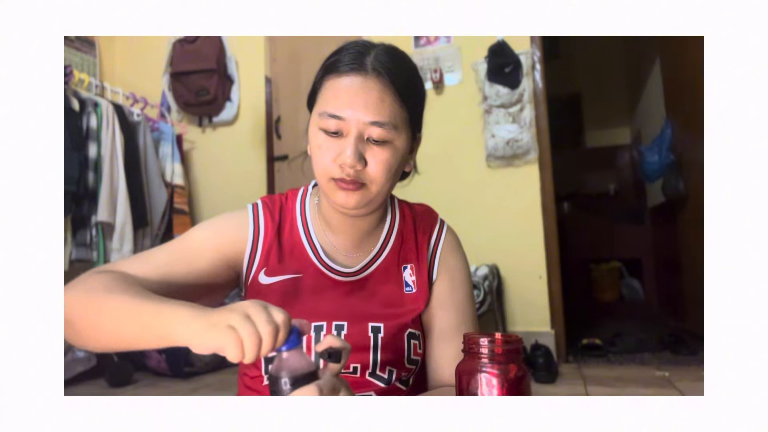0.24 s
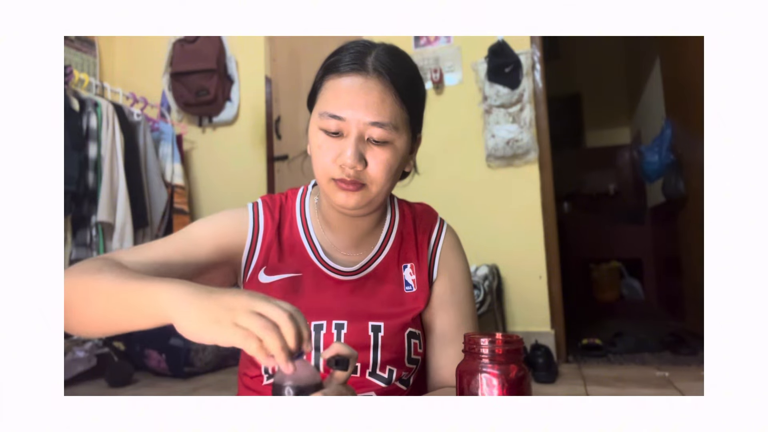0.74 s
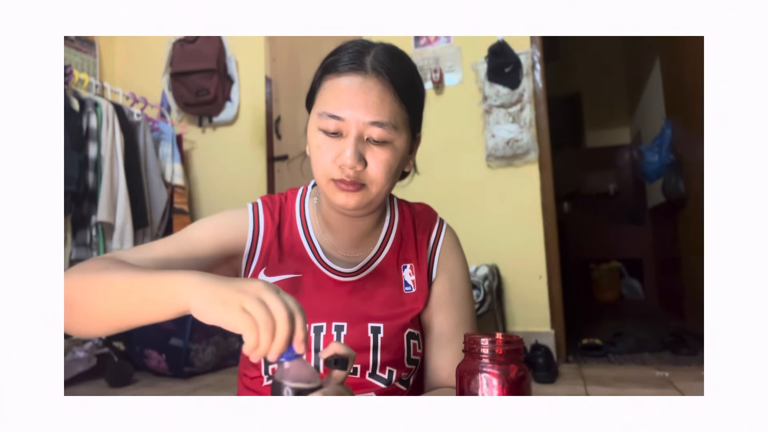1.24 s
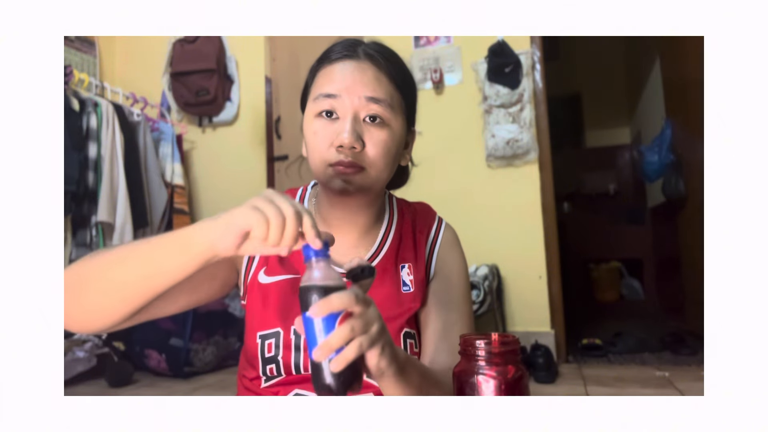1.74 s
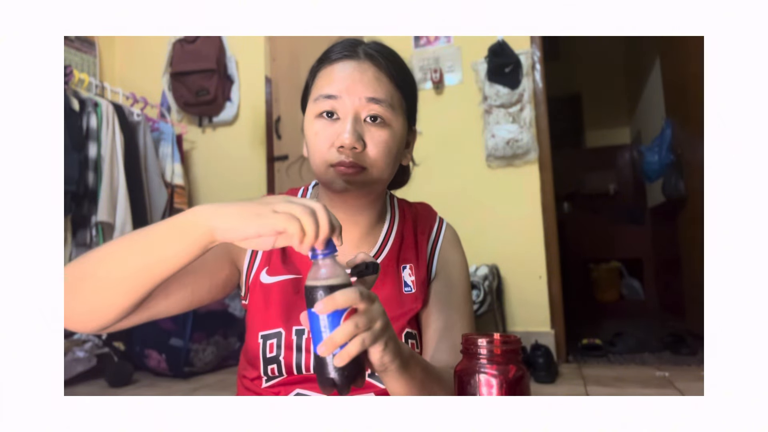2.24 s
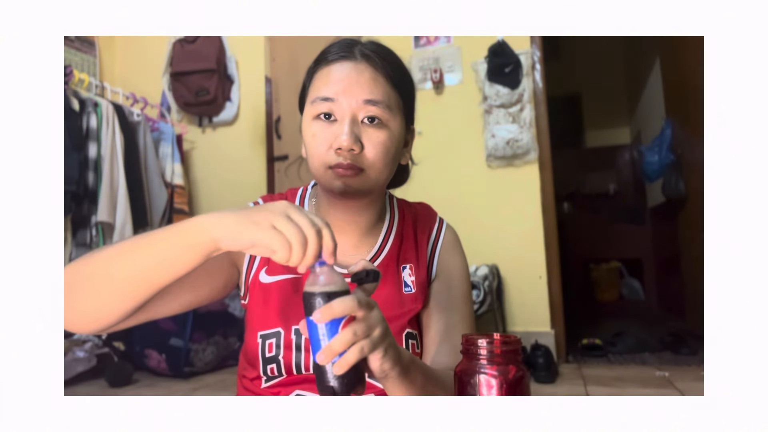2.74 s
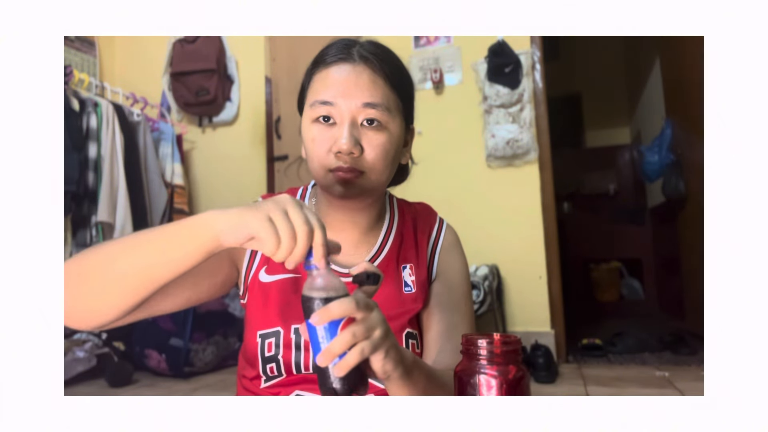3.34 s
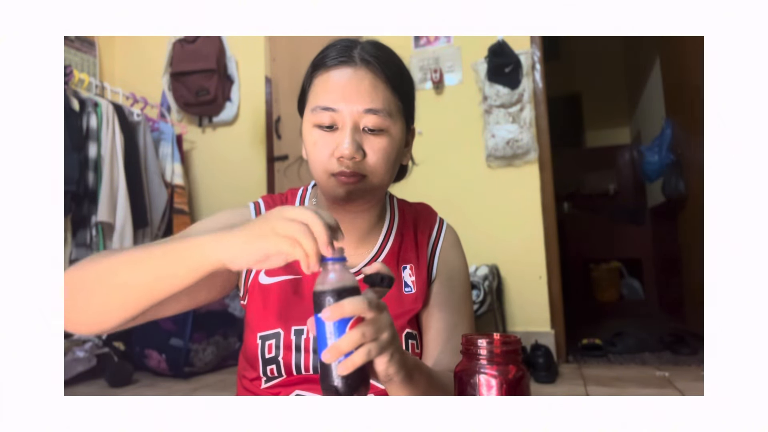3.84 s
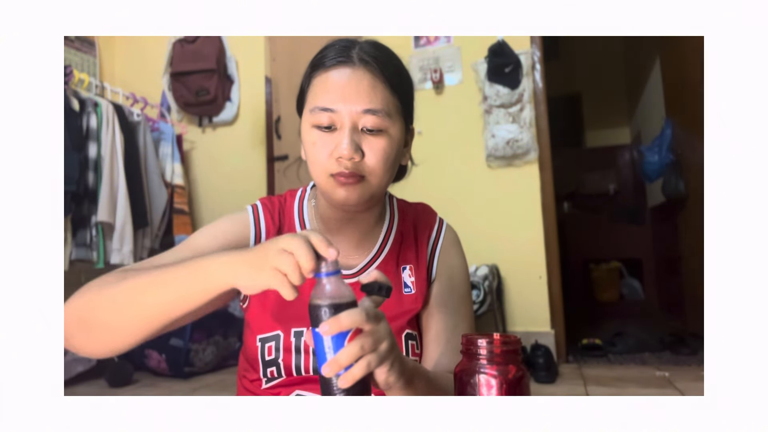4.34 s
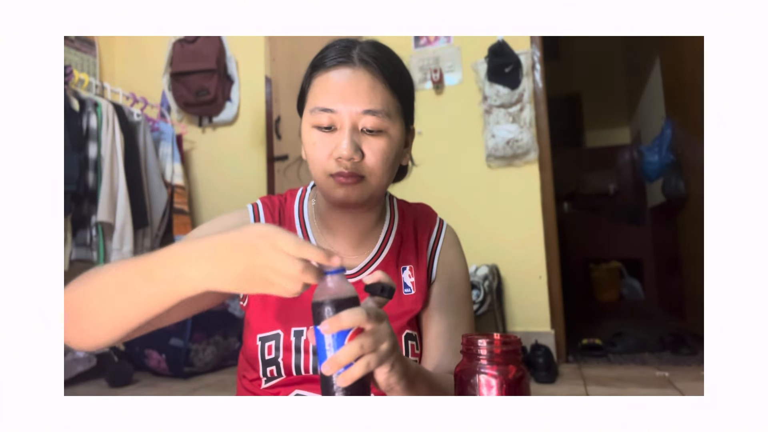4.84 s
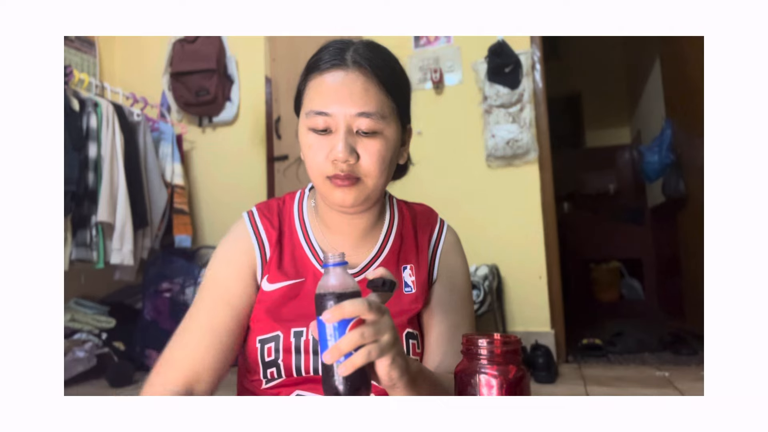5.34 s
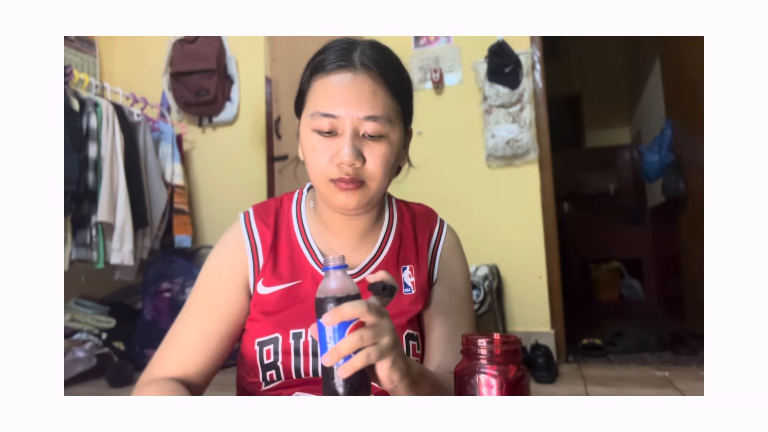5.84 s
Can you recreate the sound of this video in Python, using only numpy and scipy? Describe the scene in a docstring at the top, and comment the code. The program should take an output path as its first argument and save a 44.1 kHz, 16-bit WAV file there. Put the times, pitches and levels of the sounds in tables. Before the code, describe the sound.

Close phone pickup in a small, quiet room with short reflections. At about 0.05 seconds a plastic bottle cap's seal breaks with a loud double crack. Gas hiss swells from 0.1, peaks around 0.27 as a bright, grainy, sputtering jet with fizzy treble, and collapses by 0.43. Crisp clicks land at 0.4 and 0.55. Then near silence: faint finger rubs and a thin tick at 1.34. From 1.8 to 2.9 there are only barely audible touches, soft low hum swells and watery background murmur. Light taps come at 2.88 and 3.05, a small dull-to-sharp cluster at 3.58, a faint tick at 3.8 and a stronger bright click at 3.87. Another click at 4.55 leads to a firm, tight clatter with a hollow plastic note at 4.65. Around 5.6 there are faint ticks and a soft rub, then quiet handling and muffled airy noise until about 6 seconds.

```python
"""Gas hisses out past the thread of a plastic soda bottle opened close to a phone in a small room.
The gas is enveloped, sputtering noise. The seal snaps, then the cap clicks on its ridges and taps the
hollow neck: short rings, noise cracks, decaying modes and room tails. Behind are finger rubs, narrow
warbles and a swelling low hum (noise bands), patchy air, hiss and a faint whine (sines)."""
import sys
import numpy as np
from scipy import signal
from scipy.fft import rfft, irfft, next_fast_len
from scipy.io import wavfile
from scipy.ndimage import uniform_filter1d, map_coordinates

SR = 44100
rng = np.random.default_rng(int(sys.argv[2]) if len(sys.argv) > 2 else 0)


def bounce(signal):
    """Save signal as a 16-bit WAV file at the path given by the first command-line argument."""
    frames = np.transpose(np.atleast_2d(signal))
    limited = np.clip(frames, -1, 1)
    pcm = np.round(limited * 32767).astype(np.int16)
    wavfile.write(sys.argv[1], SR, pcm)


N = 268128

# Gas flow past the thread. Each row: time in seconds, jet level in dB, fizz level in dB over the jet.
GAS_FLOW = [(0, -45, -12.5), (.04, -44.5, -16.5), (.065, -47, -22), (.098, -44, -18), (.105, -37, -10.5),
            (.125, -29, -8), (.15, -20.5, -4.5), (.195, -13, -4.5), (.27, -10.5, -7.5), (.32, -13, -7.5),
            (.37, -26, -9.5), (.4, -31.5, -16), (.43, -52.5, -14.5), (.46, -71, -26), (.55, -91.5, -40)]
# Spectra of the jet, its fizz and the bottle wall. Each row: frequency in Hz, relative density in dB per Hz.
JET_SPECTRUM = [(880, -49.5), (1500, -20), (2170, -14.5), (2450, -11.5), (3340, -1), (3970, 1.5),
                (4520, -0.5), (5040, 1), (6150, -21), (7000, -22), (9100, -45.5), (15400, -120)]
FIZZ_SPECTRUM = [(3530, -36.5), (6000, -1.5), (6530, -3), (7970, 0), (9000, -3.5), (10200, -2.5),
                 (11800, -11.5), (12600, -9), (13700, -4), (14800, -10.5), (15800, -19)]
WALL_SPECTRUM = [(71, -45.5), (120, -16), (221, -18.5), (372, -11), (841, -11.5), (2200, -3.5),
                 (2860, -28.5), (4840, -120)]
# Cap clicks. Each row: start in seconds, level in dB, ring in Hz, swell in ms (before a 1.2 stretch), then
# crack in dB and its treble in dB (both before fixed trims), centre of the excited hollow modes in Hz,
# hollow in dB and room in dB (both before fixed gains).
CAP_CLICKS = [(0.0492, -12, 3390, 1.5, 0.5, 4, 870, -14, -14.5),
              (0.0517, 0.5, 2642, 0.78, -1.5, -7.5, 2400, -17, -17),
              (.052, -0.5, 3918, 1.06, -0.5, 1, 826, -27.5, -17),
              (0.3996, -6, 3320, 0.25, -4, 10, 2100, -34.5, -26.5),
              (0.4027, -15, 4420, .44, -9, 17, 2090, -39.5, -19),
              (0.5545, -4, 3570, 0.35, -13, 7.5, 2400, -27, -20),
              (0.556, -21.5, 2940, .52, -17, 16, 451, -23.5, -2.6),
              (0.949, -67.5, 3610, 1.13, -14.5, 2.1, 2400, -20.5, -19),
              (1.3385, -39.5, 4200, 2.2, -4, -.6, 2400, -22.5, 7.5),
              (1.3414, -17, 3630, 0.29, -22.5, 27, 1220, -60, -14),
              (1.3429, -20, 4660, .46, -11, 22, 2390, -28, -17.5),
              (1.875, -69.5, 2400, .4, -8.5, -5.5, 1156, 2.5, -9),
              (2.415, -58.5, 2890, 2.5, -23, -3, 719, -1, 9),
              (2.8742, -31.5, 3300, 0.12, -9, 0.5, 356.6, -17.5, -8),
              (2.8843, -23.5, 3470, 0.17, -10, -18.5, 349, -27, -11),
              (3.0478, -19.5, 1176, 0.42, -36.5, -11.5, 861, -30, -1),
              (3.0506, -25.5, 3534, 0.31, -7.5, -35, 450, -21.5, -17),
              (3.5784, -27.5, 246.2, 2.34, -5, -12, 110, -11.5, -5),
              (3.581, -28, 3640, .53, -2, -11, 340, -10, -30),
              (3.583, -24, 3600, 0.51, -5, -5, 2400, -20, -15),
              (3.5869, -26.5, 3440, 0.08, 1.5, -12.5, 441, 5.5, -17.5),
              (3.8, -25, 3505, 0.74, -13, 11, 674, -15.5, -12.5),
              (3.8642, -35, 4440, 1.5, -3.5, 8, 864, -24.5, -15),
              (3.8688, -3, 3825, 1.1, -14.5, 0.8, 767, -22.5, -19.5),
              (4.5532, -14, 2990, 0.33, -20, -13.5, 700, -34, -19),
              (4.5552, -31.5, 4460, 0.71, -1.5, 1, 2400, -21, -11),
              (4.6499, -32.5, 3988, 1.5, 4.5, 12.5, 860, -17.5, -13),
              (4.6537, -11.5, 7126, 1.1, -6, 2.5, 2420, -37.5, -25),
              (4.654, -9, 3340, 0.62, 4.5, -0.53, 784, -16, -21),
              (4.6549, -13.5, 1154, .9, -6.5, -1, 713, -13, -5),
              (4.6556, -15, 1951, .7, -9, .1, 2050, -30, -12),
              (4.6558, -8, 3594, .59, -3.5, 12, 1150, -23.5, -23),
              (5.5693, -38, 4230, .3, -5.5, -14, 1150, -14, -2),
              (5.584, -40.5, 3280, 0.72, -1, -19, 688, -13, -0.5),
              (5.5903, -46, 3310, .6, -8, 3, 2050, -9, -6)]
# Crack of the plastic. Each row: frequency in Hz, relative density in dB per Hz.
CRACK_SPECTRUM = [(180, -50), (300, -29.5), (690, -14.5), (2080, -2), (2590, -2), (3560, 0.5), (5140, -6.5),
                  (5600, -19.5), (7280, -45.5), (12300, -120)]
# Modes of neck, wall and hand. Each row: frequency in Hz, T60 in seconds.
HOLLOW_MODES = [(110, 0.073), (345, 0.079), (450, 0.028), (692, .048), (775, 0.052), (864, .045),
                (1150, .035), (2050, 0.034), (2400, 0.035)]
# Room decay. Each row: frequency in Hz, T60 in seconds before the extra drop.
ROOM_T60 = [(200, .25), (800, 0.27), (3500, 0.15), (5200, 0.32), (8000, .25), (15000, .25)]
# Fingers rub the cap, a little gas leaks.
# Each row: middle in seconds, length in seconds, centre in Hz, width in Hz, level in dB before grain.
FINGER_RUBS = [(.47, .06, 3570, 916, -66), (0.658, 0.11, 3125, 900, -71), (.81, .036, 3310, 499.3, -76.5),
               (1.131, .11, 4083, 441, -66.5), (1.273, 0.19, 3770, 849, -66.5),
               (1.93, 0.23, 1700, 601, -78), (2.08, .063, 3990, 497.4, -76.5),
               (2.162, .048, 4400, 290.6, -71), (2.219, .14, 3268, 1100, -77),
               (2.439, 0.037, 2573, 350, -64), (2.447, 0.078, 1390, 602, -68), (2.801, .17, 4000, 912, -73),
               (2.961, .16, 4200, 500, -70), (3.032, 0.028, 3705, 1005, -58.5),
               (3.558, 0.037, 3580, 996, -60), (3.66, 0.11, 3530, 1202, -71), (4.84, 0.059, 3860, 300, -77),
               (5.607, 0.058, 3400, 980, -55), (5.605, 0.053, 7610, 400, -78),
               (5.651, 0.053, 3300, 1000, -68), (5.692, 0.1, 2030, 597, -71.5),
               (5.953, 0.13, 3680, 250, -66.5), (5.96, 0.091, 3030, 180.5, -71),
               (5.96, 0.23, 1336, 200, -58), (6.01, 0.16, 1830, 140, -66)]
# Clearest narrow warbles, same columns: middle in seconds, length in seconds, centre in Hz, width in Hz,
# level in dB before grain.
CLEAR_WARBLES = [(.5, 0.11, 2100, 30, -73), (.54, 0.27, 419, 215, -55), (.73, 0.23, 639, 59, -73.5),
                 (.95, .14, 1289, 30, -81), (1.02, 0.095, 415, 116, -70), (1.512, 0.085, 377, 20.3, -55),
                 (1.65, .32, 1037, 15, -75), (2.081, .11, 603, 27.7, -72), (2.131, 0.28, 869, 25, -78),
                 (2.382, 0.06, 956, 28.4, -62), (2.44, .083, 732, 57, -64), (2.58, .12, 391, 54, -71.5),
                 (2.71, 0.064, 718, 24, -66), (2.75, 0.24, 1806, 133, -79.5), (2.799, .27, 796, 20, -74.5),
                 (2.98, 0.26, 1378, 123, -68.5), (3.3, 0.34, 1560, 28, -84), (3.421, .3, 396, 120, -65.5),
                 (3.47, .15, 1039, 130, -67), (3.65, 0.26, 1606, 38.6, -75), (3.721, 0.46, 686, 29, -63),
                 (3.75, 0.67, 1090, 115, -75.5), (4.02, 0.27, 799, 13.8, -65), (4.1, .11, 444.4, 21.3, -65),
                 (4.119, .16, 580, 29, -59), (4.135, 0.081, 2043, 40, -72.5), (4.21, 0.092, 983, 57, -57.5),
                 (4.27, 0.18, 1560, 79, -71), (4.306, .13, 303, 29, -64.5), (4.43, 0.13, 938, 93, -66),
                 (4.47, 0.1, 1630, 27, -76), (4.501, 0.29, 1223, 21, -71.5), (4.522, 0.45, 634, 35, -61),
                 (4.874, .094, 681, 23, -66), (4.967, 0.075, 981.5, 13.4, -48.5),
                 (4.99, 0.069, 671, 21, -65.5), (5.073, 0.15, 979, 15, -60), (5.1, 0.31, 1785, 36, -73),
                 (5.13, .19, 445, 35, -69.5), (5.241, .19, 2308, 53, -77), (5.269, 0.17, 1152, 31, -67),
                 (5.472, 0.065, 683, 11.2, -50.5), (5.548, 0.16, 1080, 28.6, -62),
                 (5.618, 0.26, 685, 44.5, -62.5), (5.66, 0.19, 372, 44, -61), (5.699, 0.05, 1046, 22, -55),
                 (5.701, 0.14, 1281, 48, -62.5), (5.72, 0.32, 860, 25, -67), (5.763, .22, 1556, 15, -68),
                 (5.82, 0.15, 2088, 25, -68.5), (5.82, .18, 1016, 27, -62.5), (5.91, .14, 1099, 27.3, -63)]
# Hum swells. Each row: middle in seconds, length in seconds, low band in dB, upper band in dB.
HUM_SWELLS = [(0.061, 0.038, -30.5, -52.5), (.2, 0.27, -43.5, -57), (.38, 0.17, -48, -70),
              (.57, 0.15, -48.5, -63), (0.797, 0.088, -71.5, -75.5), (1.25, .2, -76.5, -63),
              (1.499, .2, -85, -68.5), (1.789, .16, -52, -74), (2.01, .13, -47, -61.5),
              (2.19, 0.13, -53.5, -65.5), (2.339, 0.1, -53, -66), (2.89, .06, -72, -90),
              (3.068, 0.075, -63.5, -73), (3.335, 0.035, -62.5, -59.5), (3.482, 0.17, -44, -56.5),
              (3.66, 0.18, -43, -53.5), (3.85, 0.22, -46.5, -62), (4.093, .17, -52.5, -63),
              (4.38, 0.15, -51.5, -57), (4.56, .08, -56.5, -62), (4.679, 0.096, -54.5, -59.5),
              (4.912, 0.043, -84, -59.5), (5.25, .07, -61.5, -84), (5.5, .09, -58.5, -75.5),
              (5.762, 0.15, -57.5, -75)]
# The two hum bands. Each row: frequency in Hz, relative density in dB per Hz.
HUM_LOW_SPECTRUM = [(25, -21), (40, -12), (54, -3.5), (70, -10.5), (95, -23)]
HUM_UPPER_SPECTRUM = [(80, -13.5), (110, -0.5), (140, -3.5), (170, -10.5), (210, -24.5)]
# Background air. Each row: time in seconds, level in dB before a fixed cut.
AIR_LEVEL = [(0, -61.5), (.23, -41.5), (.4, -57.5), (.55, -64.5), (.74, -70), (1.3, -74), (2, -68.5),
             (2.32, -74), (3.001, -62.5), (3.32, -69), (3.69, -59.5), (4.59, -62), (4.72, -65),
             (5.49, -61.5), (6.08, -63.5)]
# Air and microphone hiss. Each row: frequency in Hz, relative density in dB per Hz.
AIR_SPECTRUM = [(90, -30.5), (150, -0.5), (380, -0.5), (800, -6.5), (1200, -8.5), (1700, -17.5),
                (2500, -25.5), (4800, -34), (6000, -32.5), (7800, -54.5)]
HISS_SPECTRUM = [(1470, -32), (2500, -5), (3770, -7.5), (4050, -8), (12500, -13.5), (16000, -19)]
# Steady whine. Each row: frequency in Hz, peak level in dB.
WHINE_LINES = [(800, -88.5), (1600, -92.5)]
# The phone's port, which dips above its resonance. Each row: frequency in Hz, gain in dB.
PORT_RESPONSE = [(100, -0.5), (5100, -0.5), (5500, -4.5), (6000, -3), (6800, -4.5), (7900, -1),
                 (16000, -1.5)]

WALL_DB, WALL_DB_PER_JET_DB = -19.5, .85  # over the jet at full flow; swings less than the jet
REACH_OCTAVES = .12  # how wide a band of modes one click excites
# lesser warbles: median pitch, scatter, median length, width, offset from AIR_LEVEL
STRAY_HZ, STRAY_OCTAVES, STRAY_S, STRAY_WIDTH_HZ, STRAY_OFFSET_DB = 830, 0.6, 0.046, 27, -13.5
HUM_FLOOR_DB = -86.5
TOP_HZ = 16000


def amp(db):
    """dB to gain."""
    return 10 ** (np.asarray(db) / 20)


def unit(x):
    """Scaled to rms 1."""
    return x / np.sqrt(np.mean(x ** 2) + 1e-20)


def along(points, hz):
    """Interpolates (Hz, value) points on a log frequency axis."""
    f, v = np.transpose(points)
    return np.interp(np.log(hz + 1), np.log(f + 1), v)


def curves(rows):
    """One value per sample for each column after the time."""
    s, *cols = np.transpose(rows)
    return [np.interp(np.arange(N) / SR, s, c) for c in cols]


def wobble(rate_hz):
    """Smooth random curve, rate_hz knots a second."""
    knots = rng.standard_normal(int(N * rate_hz / SR) + 4)
    return map_coordinates(knots, [np.arange(N) * rate_hz / SR])


def filtered(x, response):
    """x times a response of frequency."""
    m = next_fast_len(len(x) + 8192)
    return irfft(rfft(x, m) * response(np.fft.rfftfreq(m, 1 / SR)), m)[:len(x)]


def noise(spectrum, size=N):
    """Coloured noise of rms 1, its response zero outside the spectrum."""
    def response(hz):
        inside = (hz > spectrum[0][0]) & (hz < spectrum[-1][0])
        return amp(along(spectrum, hz)) * inside
    return unit(filtered(rng.standard_normal(size), response))


def add(track, s, sound):
    """Mixes a sound in at s seconds."""
    start = round(s * SR)
    sound = sound[max(-start, 0):]
    part = track[max(start, 0):][:len(sound)]
    part += sound[:len(part)]


def gas():
    """Turbulent jet through the thread: foam makes it sputter, hundreds of times a second."""
    jet_db, fizz_db = curves(GAS_FLOW)
    closing_s = np.clip(np.arange(N) / SR - GAS_FLOW[-1][0], 0, 1)
    jet_db = jet_db - 200 * closing_s  # the leak closes
    wall_db = jet_db.max() + WALL_DB + WALL_DB_PER_JET_DB * (jet_db - jet_db.max())
    sputter = wobble(600)
    jet = unit(amp(2.0 * sputter) * noise(JET_SPECTRUM))
    fizz_sputter = amp(1.2 * sputter + 1.2 * wobble(900))
    fizz = amp(fizz_db) * unit(fizz_sputter * noise(FIZZ_SPECTRUM))
    return amp(jet_db) * (jet + fizz) + amp(wall_db) * noise(WALL_SPECTRUM)


def room_tail(reach_s):
    """Random room response: decay varies with frequency, and an extra drop reaches 20 dB at reach_s."""
    hz, t, z = signal.stft(rng.standard_normal(SR // 3), SR, nperseg=256)
    late = amp(-60 * t / along(ROOM_T60, hz)[:, None] - 20 * (t / reach_s) ** 3)
    early = amp(6.0 - 60 * t / 0.017)
    tail = signal.istft(z * (late + early), SR, nperseg=256)[1]
    return np.pad(tail / np.linalg.norm(tail), (150, 0))  # delay in samples


def cap_ring(t, ring_hz, swell_ms):
    """Short ring of the cap, too small to radiate bass."""
    u = 2 * t / (1.2 * swell_ms / 1000)
    ring = (u / 2) ** 2 * np.exp(2 - u) * np.sin(2 * np.pi * ring_hz * t)
    return signal.sosfilt(signal.butter(4, ring_hz / 2, 'high', fs=SR, output='sos'), ring)


def hollow_note(t, around_hz, hollow_db):
    """Slower note of neck and hand: decaying modes near around_hz."""
    modes = np.zeros(len(t))
    for hz, t60_s in HOLLOW_MODES:
        excited = np.exp(-(np.log2(hz / around_hz) / REACH_OCTAVES) ** 2)
        modes += excited * amp(-60 * t / t60_s) * np.sin(2 * np.pi * hz * t)
    return amp(hollow_db) * modes * (1 - np.exp(-t / 0.0027)) ** 2


def cap():
    """Each click: ring of the cap, crack of plastic, hollow note, and the room's answer."""
    track, t = np.zeros(N), np.arange(SR // 16) / SR
    for s, db, ring_hz, swell_ms, crack_db, treble_db, around_hz, hollow_db, room_db in CAP_CLICKS:
        ring = cap_ring(t, ring_hz, swell_ms)
        top_hz = 17000 * amp(.16 * db)  # a weaker click is a duller one

        def colour(hz):
            treble = amp(treble_db - 13.5 + along(FIZZ_SPECTRUM, hz)) * np.exp(-(hz / top_hz) ** 4)
            return amp(along(CRACK_SPECTRUM, hz)) + treble

        grit = unit(filtered(rng.standard_normal(len(t)), colour))
        crack = amp(crack_db + 2.5) * grit * amp(-60 * t / 0.011) * (1 - np.exp(-t / 0.00013)) ** 2
        hollow = hollow_note(t, around_hz, hollow_db)
        add(track, s, amp(db) * (ring + crack + 3.7 * hollow))
        tail = room_tail(0.16 * amp(.2 * db))  # the tail of a weaker click is lost sooner
        scattered = filtered(tail, colour)  # the crack radiates all round, the ring mostly forward
        add(track, s, amp(db + room_db + crack_db + 19.5) * scattered / np.linalg.norm(scattered))
        add(track, s, amp(db + room_db) * signal.fftconvolve(0.34 * ring + 0.48 * hollow, tail))
    return track


def patches(rows, grain_db):
    """Noise bands that swell and fade, with random level grain."""
    track = np.zeros(N)
    t = np.arange(-SR // 2, SR // 2) / SR
    for middle_s, length_s, hz, width_hz, db in rows:
        band = filtered(rng.standard_normal(len(t)), lambda f: np.exp(-.5 * ((f - hz) / width_hz) ** 2))
        swell = np.exp(-np.abs(2 * t / length_s) ** 2.6)
        rms = np.sqrt(np.sum((swell * band) ** 2) / np.sum(swell ** 2))
        add(track, middle_s - .5, amp(db) * swell * band / rms)
    return track * amp(grain_db * wobble(250))


def rubs():
    """Fingers rubbing the cap and slight leaks: short, mostly broad bands of grainy noise."""
    return patches(FINGER_RUBS, grain_db=2.0)


def warbles(count=40):
    """Narrow bands that come and go; lesser ones fall at random and follow the level of the air."""
    air_s, air_db = np.transpose(AIR_LEVEL)
    when_s = (np.arange(count) + rng.random(count)) * N / SR / count
    stray = []
    for s, (a, b, c) in zip(when_s, rng.standard_normal((count, 3))):
        length_s = STRAY_S * 2 ** (.5 * a)
        hz = STRAY_HZ * 2 ** (STRAY_OCTAVES * np.clip(b, -2, 2))
        db = np.interp(s, air_s, air_db) + STRAY_OFFSET_DB + 2 * c - 3 * b  # higher is fainter
        stray.append((s, length_s, hz, STRAY_WIDTH_HZ, db))
    return patches(CLEAR_WARBLES + stray, grain_db=1.6)


def hum():
    """Two low noise bands that swell together and sink to a faint floor."""
    middle_s, length_s, low_db, upper_db = np.transpose(HUM_SWELLS)[:, :, None]
    swell = np.exp(-np.abs(2 * (np.arange(N) / SR - middle_s) / length_s) ** 2.4)
    low, upper = [np.max(amp(db) * swell, axis=0) + amp(HUM_FLOOR_DB) for db in (low_db, upper_db)]
    return low * noise(HUM_LOW_SPECTRUM) + upper * noise(HUM_UPPER_SPECTRUM)


def background():
    """Air noise, partly even and partly patchy in time and frequency, plus hiss and a faint sine whine."""
    z = signal.stft(noise(AIR_SPECTRUM), nperseg=1024)[2]
    field = uniform_filter1d(rng.standard_normal(z.shape), size=2, axis=0)  # across frequency
    field = uniform_filter1d(field, size=11, axis=1)  # across time
    patchy = unit(signal.istft(z * amp(6 * unit(field)), nperseg=1024)[1][:N])
    air = amp(curves(AIR_LEVEL)[0] - 8.0) * patchy + amp(-79.0) * noise(AIR_SPECTRUM)
    whine = sum(amp(db) * np.sin(2 * np.pi * hz * np.arange(N) / SR) for hz, db in WHINE_LINES)
    return air + amp(-88.0) * noise(HISS_SPECTRUM) + whine


def scene():
    """Bottle in front, background behind."""
    return (gas() + cap() + rubs() + warbles() + hum() + background())[None]


def record(dry):
    """Port colour, then peaks rounded off near full scale, then a band limit at TOP_HZ."""
    heard = filtered(dry[0], lambda hz: amp(along(PORT_RESPONSE, hz)))
    rounded = heard / (1 + np.abs(heard / .95) ** 6) ** (1 / 6)
    return filtered(rounded, lambda hz: hz < TOP_HZ)[None]


dry = scene()
out = record(dry)
bounce(out)
```